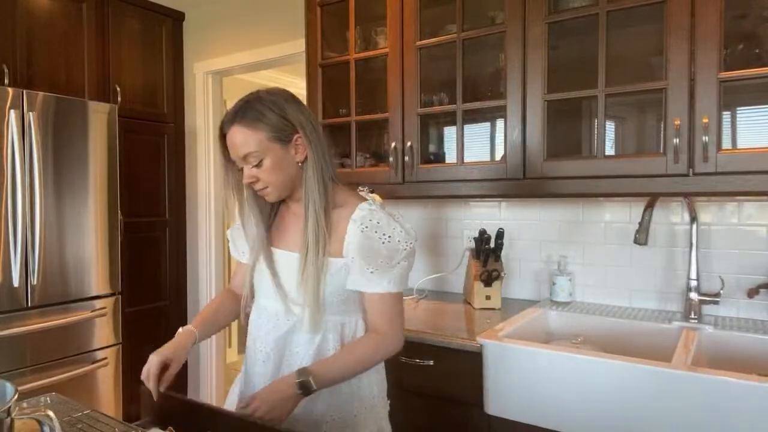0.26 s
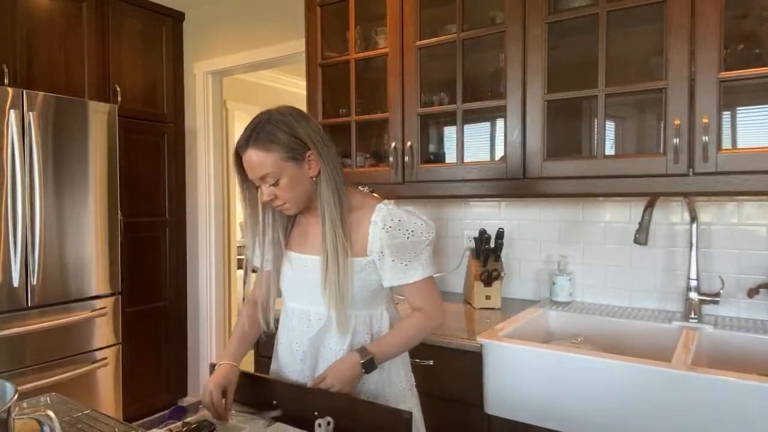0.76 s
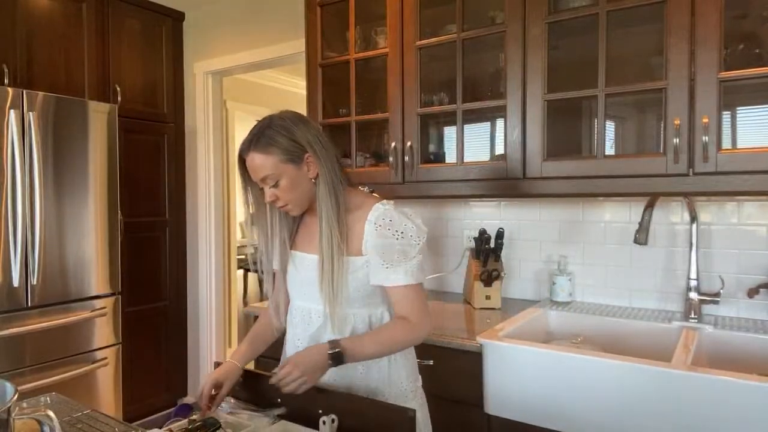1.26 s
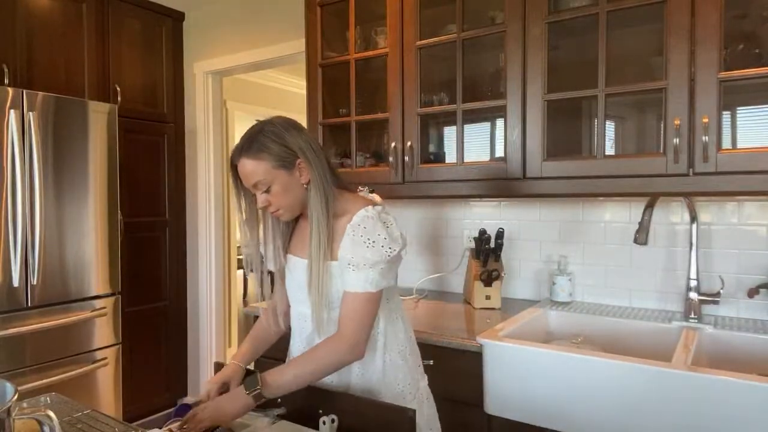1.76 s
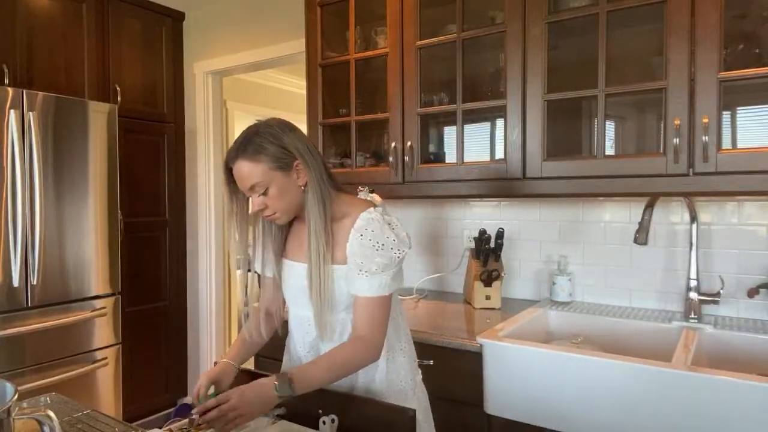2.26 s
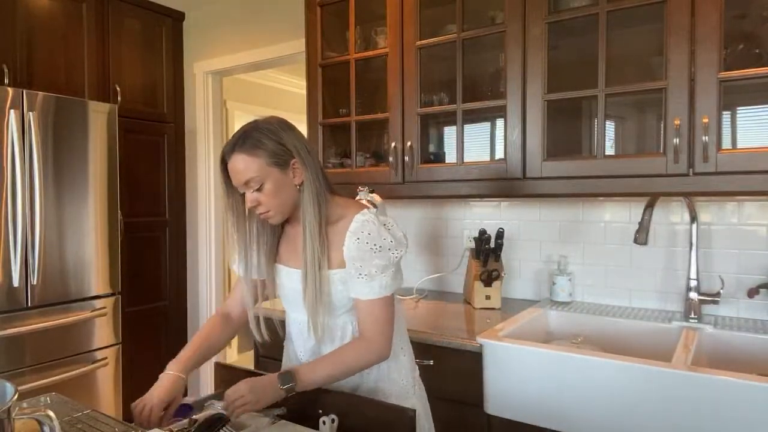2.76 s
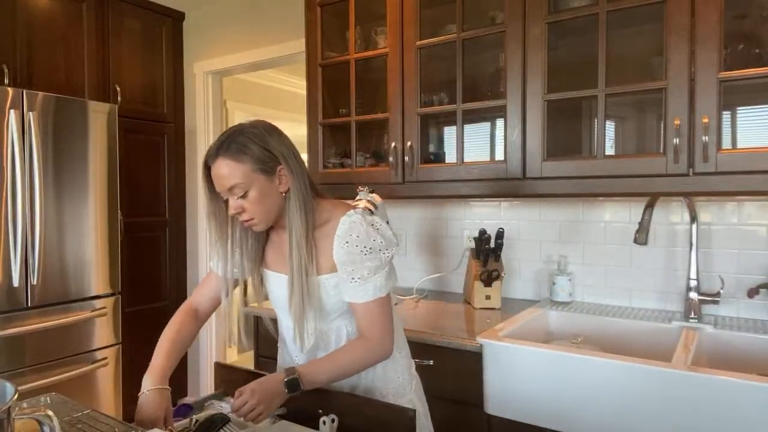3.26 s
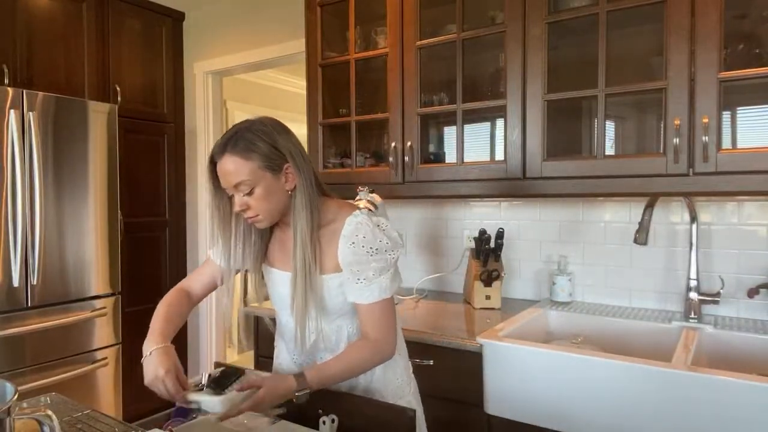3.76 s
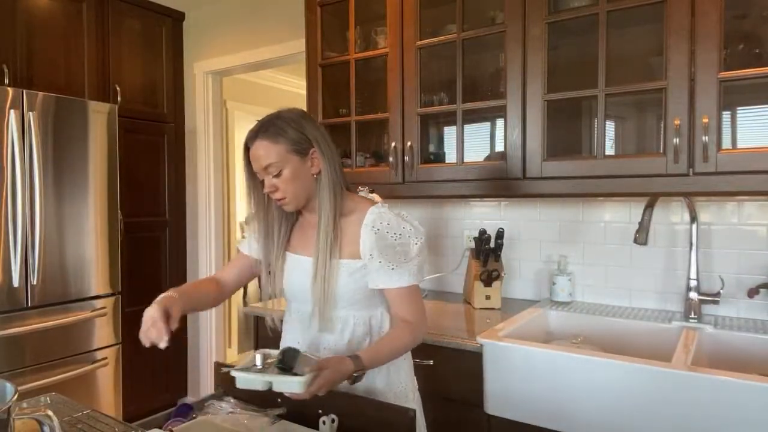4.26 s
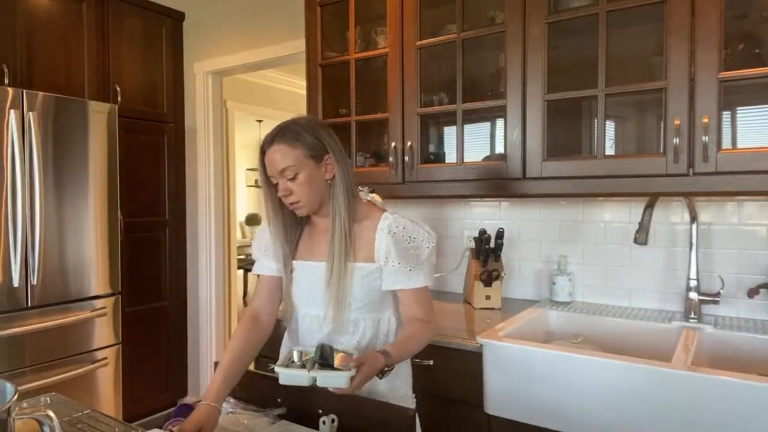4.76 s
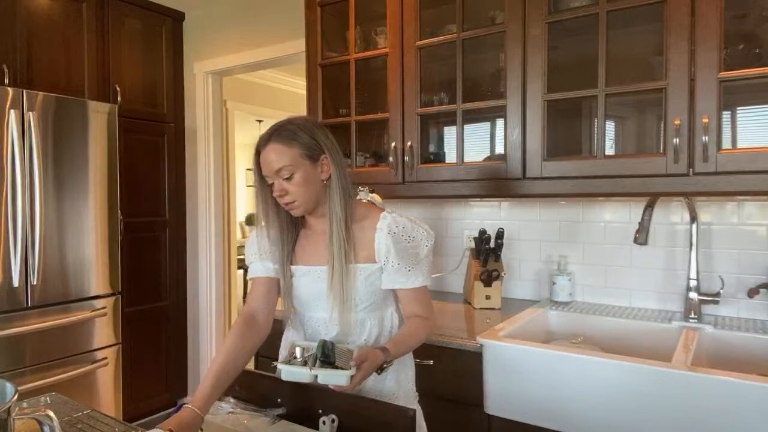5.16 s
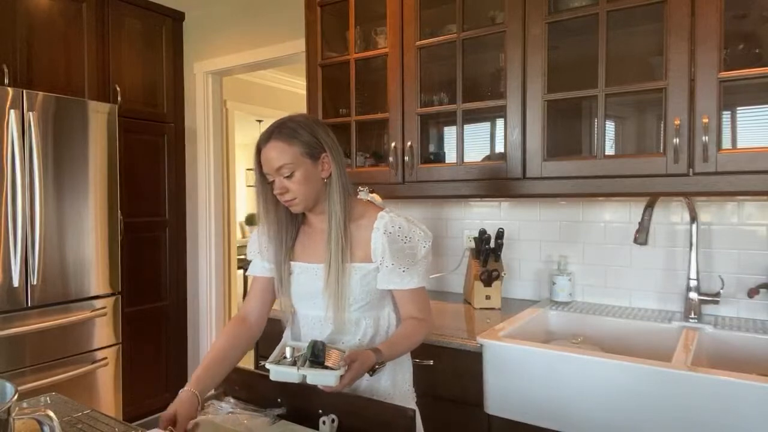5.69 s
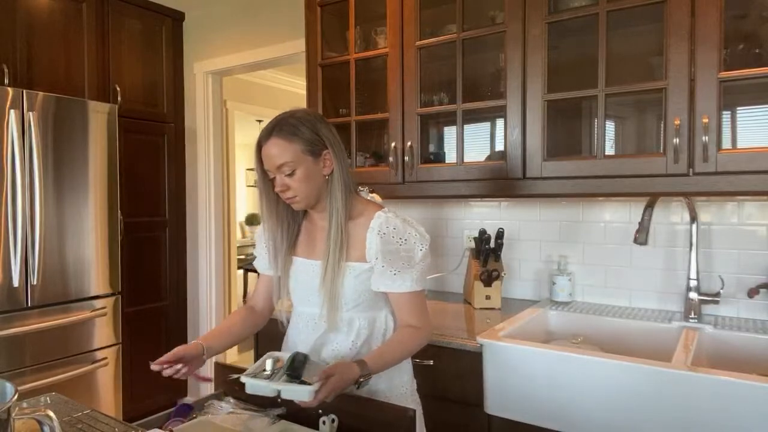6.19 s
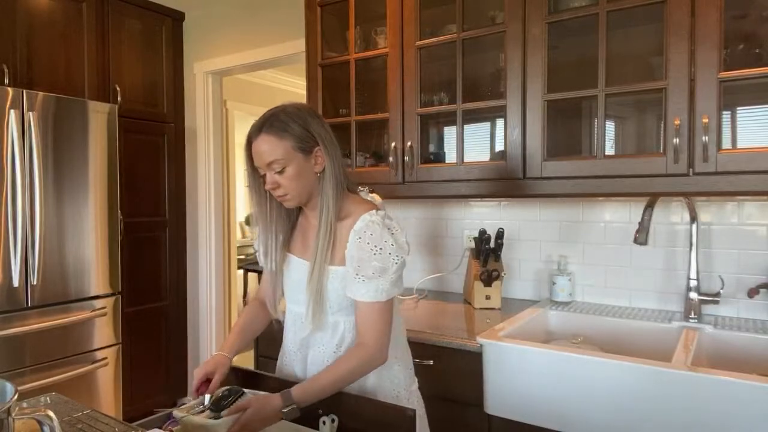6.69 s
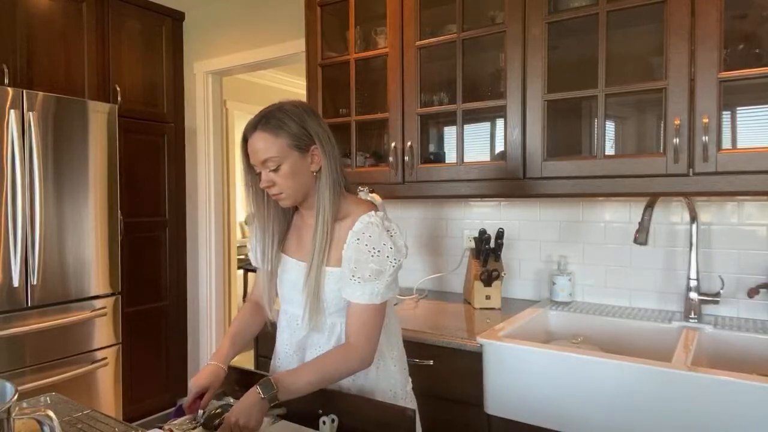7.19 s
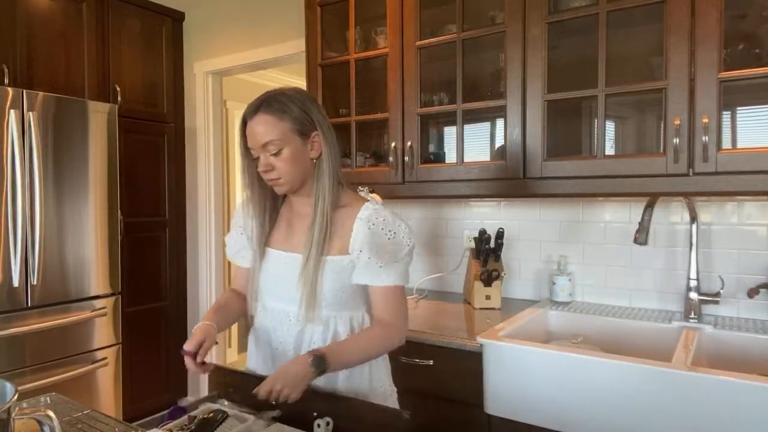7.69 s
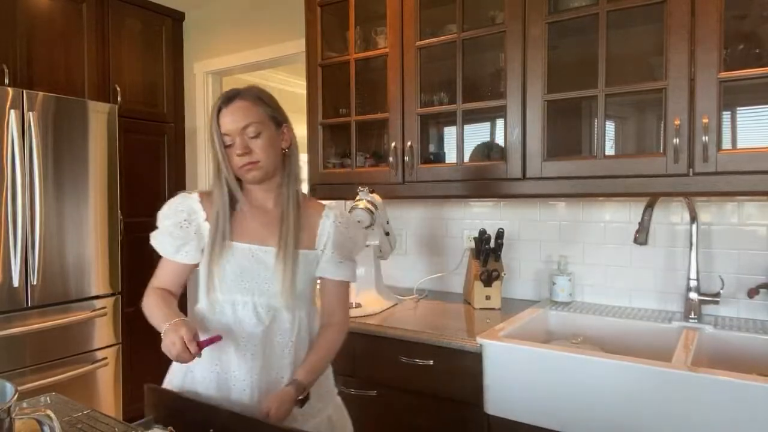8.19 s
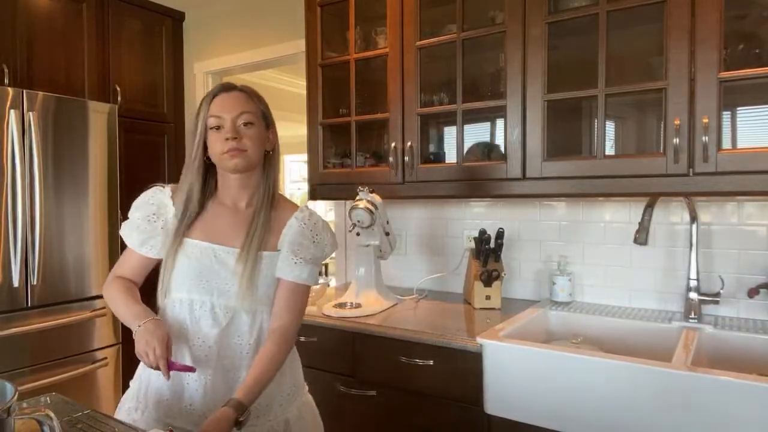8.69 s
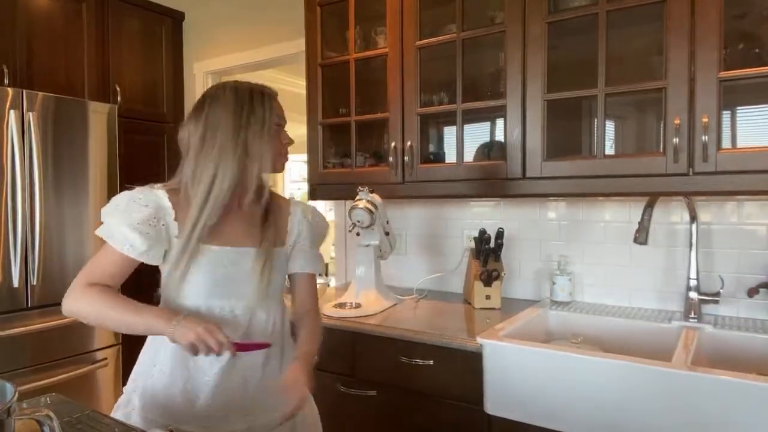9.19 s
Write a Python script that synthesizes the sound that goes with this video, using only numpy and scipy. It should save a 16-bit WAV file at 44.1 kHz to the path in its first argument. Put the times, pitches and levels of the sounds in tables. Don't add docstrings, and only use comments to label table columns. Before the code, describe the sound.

Cutlery rattles, clatters and knocks as someone searches a utensil drawer in a hard, tiled kitchen, finally rolling it closed with a heavy thud.

```python
import sys
import numpy as np
from scipy import signal
from scipy.fft import rfft, irfft
from scipy.io import wavfile
from scipy.ndimage import uniform_filter1d

SR = 44100
rng = np.random.default_rng(int(sys.argv[2]) if len(sys.argv) > 2 else 0)


def put_to_file(sound):
    columns = np.atleast_2d(sound).T
    safe = np.clip(columns, -1, 1)
    whole_steps = np.round(safe * 32767)
    wavfile.write(sys.argv[1], SR, whole_steps.astype(np.int16))


def how_loud(loudness_db):
    steps = np.asarray(loudness_db, float) / 20
    return 10 ** steps


N = 416304

# pitch_hz, width_hz, level_db
DRAWER_WOOD = [(145.3, 4.63, 11), (190, 22, -0.5), (270.7, 17, 3.5), (306, 60, -5), (412, 62, -2.5)]
# freq_hz, level_db (per Hz)
STEEL_EDGE = [(4500, -3.5), (8000, -2), (16000, -8.5)]


def colour(x, table):
    hz, db = np.transpose(table)
    f = np.fft.rfftfreq(x.shape[-1], 1 / SR) + 1
    gain = how_loud(np.interp(np.log(f), np.log(hz), db))
    return irfft(rfft(x) * gain, x.shape[-1])


def level(x, db):
    return x * how_loud(db) / np.sqrt(np.mean(x ** 2))


def peak(x, db):
    return x * how_loud(db) / np.sqrt(uniform_filter1d(x ** 2, size=176).max())


def ring(hz, db, t60, size):
    t = np.arange(size)[:, None] / SR
    sign = (-1) ** np.arange(np.size(hz))
    fade = np.exp(-np.log(1000) * t / t60)
    return (sign * how_loud(db) * np.sin(2 * np.pi * hz * t) * fade).sum(axis=1)


def body(table, size=2048):
    hz, width, db = np.transpose(table)
    t = np.arange(size)[:, None] / SR
    sign = (-1) ** np.arange(len(hz))
    modes = sign * how_loud(db) * width * np.sin(2 * np.pi * hz * t) * np.exp(-np.pi * width * t)
    return modes.sum(axis=1) * np.linspace(1, 0, size)


def contacts(shape, rate, spread_db):
    size_db = spread_db * np.minimum(rng.exponential(size=shape), 3.0)
    return (rng.random(shape) < rate / SR) * rng.standard_normal(shape) * how_loud(size_db)


def flurries(t60, rate, first, size=6144):
    t = np.arange(size) / SR
    t60 = np.clip(t60, .01, .4)[:, None]
    chatter = level(contacts((len(t60), size), rate, 0.52), 0)
    push = chatter * np.exp(-np.log(1000) * t / t60) * (1 - np.exp(-t / 0.0026))
    push[:, 0] = first
    return push


def walk(rate):
    k = int(SR / rate)
    held = np.repeat(rng.standard_normal(N // 100)[:N // k + 1], k)[:N]
    return 1.2 * uniform_filter1d(held, k)


def add(out, s, x):
    i = int(s * SR)
    out[i:i + len(x)] += x[:len(out) - i]


def steel(push, bright_db):
    # freq_hz, level_db (per Hz)
    steel_body = [(1500, 3.5), (2300, 2), (3500, -2), (7000, -12.5), (16000, -31.5)]
    edges = level(colour(push, STEEL_EDGE), 0)
    return level(colour(push, steel_body), 0) + how_loud(bright_db - 4.5) * edges


def fridge():
    # freq_hz, level_db (per Hz)
    air_colour = [(15, -72), (25, -52.5), (74, -10), (111, -6.5), (242, -0.5), (317, -6), (354, -15),
                  (451, -7), (659, -9.5), (714, -11), (1330, -12.5), (2350, -20.5), (2990, -21),
                  (16000, -40.5)]
    # pitch_hz, level_db
    hum_lines = [(651.4, -70.5), (1012, -76), (1308, -77), (2218, -84)]
    air_db = -56.5
    t = np.arange(N) / SR
    out = level(colour(rng.standard_normal(N), air_colour), air_db - 3) * how_loud(0.7 * walk(2.2))
    for hz, db in hum_lines:
        gain = np.sqrt(2) * how_loud(db + 2.9 * walk(23))
        out = out + gain * np.sin(2 * np.pi * hz * t + 1.3 * walk(10))
    return out


def kitchen(x, size=32768):
    # freq_hz, t60_s
    room_t60 = [(150, 0.46), (500, 0.3), (1500, 0.52), (5000, 0.45), (14000, 0.25)]
    room_db = -7
    t, echo = np.arange(size) / SR, 0
    hz, t60 = np.transpose(room_t60)
    for f in 88 * 2 ** np.arange(8.):
        octave = signal.butter(2, [f / np.sqrt(2), f * np.sqrt(2)], "band", fs=SR, output="sos")
        band = signal.sosfilt(octave, rng.standard_normal(size))
        band_t60 = np.interp(np.log(f), np.log(hz), t60)
        echo = echo + band * np.exp(-np.log(1000) * t / band_t60)
    echo = echo * np.clip((t - .003) / 0.012, 0, 1)
    power = abs(rfft(echo)) ** 2
    even = np.sqrt(uniform_filter1d(power, size=500) / uniform_filter1d(power, size=70))
    echo = irfft(rfft(echo) * even)[:-2048]
    return x + how_loud(room_db) * signal.fftconvolve(x, echo / np.sqrt(np.sum(echo ** 2)))[:N]


def cabinet():
    # start_s, boom_db, floor_db
    booms = [
        (8.799, -67, -61),
        (8.889, -60, -64),
        (9.096, -27, -47),
        (9.27, -32, -64),
    ]
    cabinet_hz, cabinet_t60_s = 148, 0.19
    floor_hz, floor_t60_s = 76, 0.28
    out = np.zeros(N)
    for s, boom_db, floor_db in booms:
        for hz, db, t60 in ((cabinet_hz, boom_db, cabinet_t60_s), (floor_hz, floor_db, floor_t60_s)):
            cycle = int(SR / hz)
            push = np.hanning(4 * cycle) * np.sin(np.arange(4 * cycle) * 2 * np.pi / cycle)
            add(out, s, peak(signal.fftconvolve(ring(hz, 0, t60, size=16384), push), db))
    return out


def sleeve():
    # start_s, end_s, level_db
    swishes = [(7.641, 8.295, -72.5), (8.204, 8.52, -72.5), (8.545, 8.847, -69), (8.808, 8.994, -67)]
    out = np.zeros(N)
    for start, end, db in swishes:
        size = int((end - start) * SR)
        friction = colour(contacts(32768, 20000, 1.3), STEEL_EDGE)[:size]
        add(out, start, level(friction * np.hanning(size), db))
    return out


def rustle():
    # start_s, end_s, level_db
    drag = (3.18, 3.39, -57.5)
    # pitch_hz, width_hz, level_db
    wrapper = [(5200, 570, 10), (2640, 1500, 3.5), (6000, 700, 3), (7450, 2900, -1), (8840, 1200, 1)]
    start, end, db = drag
    out, size = np.zeros(N), int((end - start) * SR)
    patter = contacts(16384, 4700, 1.5)[:size] * np.hanning(size) ** 0.81
    add(out, start, level(signal.fftconvolve(patter, body(wrapper, size=512)), db))
    return out


def sliding():
    # time_s, effort_db (over rest)
    hand = [(1.17, 2.5), (1.62, 9.5), (1.76, 26), (1.98, 2), (2.37, 7.5), (2.52, 16), (2.85, 7), (3.3, 18),
            (3.7, 0.5), (4.22, 5.5), (4.43, -1), (4.83, 12), (5.15, 15.5), (5.76, 19.5), (6.06, 7),
            (6.92, 2.5), (7.2, 20.5), (7.55, 4.5)]
    # time_s, rolling_db
    drawer_runs = [
        [(0.0, -45), (0.055, -47.5), (0.1, -42), (0.2, -43), (0.452, -40.5), (0.78, -62), (0.9, -81.5)],
        [(7.65, -80), (7.778, -75), (7.808, -47.5), (8.05, -43.5)],
        [(8.27, -47.5), (8.59, -46.5), (8.734, -50.5), (8.83, -38), (9.05, -61), (9.37, -41.5), (9.44, -72)],
    ]
    # rest_db, slope (dB per dB of effort)
    stirred = [(-62, 0.3137), (-69, 1.0166), (-73.5, 1.1146)]
    carried = [-6.5, -3.5, -13.5]
    # pitch_hz, width_hz, level_db
    tray = [(557, 230, 17), (861, 100, 16.5), (1200, 290, 8), (1760, 290, -3.5), (2350, 200, -5.5)]
    t = np.arange(N) / SR
    effort_db = np.interp(t, *np.transpose(hand))
    run_db = np.interp(t, *np.transpose(sum(drawer_runs, [])))
    roll_gain, rub_gain, scrape_gain = (np.hypot(how_loud(rest_db + slope * effort_db), how_loud(run_db + db))
                                        for (rest_db, slope), db in zip(stirred, carried))
    grip_db = walk(30)
    roll = signal.fftconvolve(contacts(N, 1500, 4.0), body(DRAWER_WOOD))[:N]
    rub = signal.fftconvolve(contacts(N, 5000, 5.0), body(tray))[:N]
    scrape = steel(contacts(N, 20000, 1.2), -8.5)
    out = level(roll, -3.5) * roll_gain * how_loud(2.2 * grip_db)
    out = out + level(rub, -8.5) * rub_gain * how_loud(grip_db)
    return out + scrape * scrape_gain * how_loud(grip_db - 8.0)


def thumps():
    # start_s, level_db, pitch_hz
    blows = [(0.071, -41, 253), (0.19, -35, 272), (0.277, -43, 258), (1.733, -53, 441), (1.877, -34.5, 433),
             (2.496, -33, 400), (3.258, -54, 439), (3.705, -56, 334), (4.948, -33, 281), (4.973, -32, 168),
             (5.065, -39, 428), (5.132, -27, 298), (5.151, -27, 291), (5.214, -36, 252),
             (5.446, -29.5, 185), (5.513, -32.5, 450), (5.601, -29, 450), (5.837, -30.5, 205),
             (6.505, -51, 236), (6.921, -38, 387), (7.099, -32, 196), (7.164, -39.5, 179),
             (7.254, -23.5, 198), (7.294, -42, 409), (7.81, -45.5, 148), (8.824, -37, 435),
             (9.094, -17.5, 403), (9.124, -31, 388), (9.264, -33.5, 412)]
    t60_s = 0.11
    out, wood = np.zeros(N), np.array(DRAWER_WOOD)
    for (s, db, hz), push in zip(blows, flurries([t60_s] * len(blows), 6000, first=25.0)):
        panel_db = -9 * abs(np.log2(wood[:, 0] / hz))
        panel = body(wood + np.outer(panel_db, [0, 0, 1]))
        add(out, s, peak(signal.fftconvolve(push, panel), db - 9.5))
    return out


def clinks(size=8192):
    # pitch_hz, level_db, t60_s
    spoon = [(8400, 0, .06), (9065, 0, .12), (12640, 2, .06), (12775, 3, .075), (12900, 2, .06),
             (13690, 3, .06), (14933, 1, .065)]
    ladle = [(9065, -2, .05), (12600, 2, .04), (12775, 3, .055), (12930, 2, .04), (14100, -6, .04),
             (15200, -5, .05)]
    fork = [(5830, 2, .07), (7860, 7, .07), (8050, 5, .06), (9631, -2, .06), (10427, -3, .1),
            (12909, -3, .08), (14104, 2, .08), (14217, 6, .06), (15149, -2, .06)]
    # start_s, peak_db
    spoon_hits = [(1.74, -43), (1.771, -45), (6.9744, -65)]
    ladle_hits = [(7.199, -54), (7.27, -51)]
    fork_hits = [(4.1566, -51), (4.2434, -61)]
    # start_s, level_db, pitch_hz, jostle_s
    pings = [(0.659, -53, 2400, 0.0068), (1.584, -48, 2000, 0.0075), (1.625, -56, 2160, 0.0042),
             (1.74, -40, 10040, 0.012), (5.708, -60, 4350, .015), (3.421, -70, 5600, .02),
             (4.242, -47, 2140, 0.0059), (4.907, -55, 6000, 0.018), (5.218, -56, 3370, 0.011),
             (5.26, -34.5, 2480, 0.0054), (5.33, -60, 11800, 0.018), (5.657, -52, 2880, 0.014),
             (5.784, -46.5, 6080, 0.011), (5.793, -51, 1830, 0.033), (5.853, -51, 2900, 0.018),
             (7.055, -60, 3100, 0.03), (5.9, -68, 9700, .03), (6.606, -69, 13650, 0.026),
             (7.205, -50.5, 2900, 0.022), (7.035, -63.5, 6000, .015), (7.035, -57, 7500, 0.0091),
             (8.771, -59, 4100, 0.11), (9.39, -58, 4220, 0.052), (2.493, -34.5, 1900, 0.017),
             (9.096, -24.5, 375, 0.017), (4.999, -52, 1430, 0.02), (5.148, -45, 332, 0.0072)]
    out, t = np.zeros(N), np.arange(size) / SR
    for modes, hits in ((spoon, spoon_hits), (ladle, ladle_hits), (fork, fork_hits)):
        hz, db, t60 = np.transpose(modes)
        for s, hit_db in hits:
            jostle = contacts(size, 600, 3.0) * np.exp(-t / 0.022)
            rung = signal.fftconvolve(ring(hz, db, t60, size=size), jostle)
            add(out, s, peak(rung, hit_db - 1.0))
    for (s, db, hz, length), jostle in zip(pings, contacts((len(pings), size), 3400, 0.91)):
        jostle[0] = 2.6
        note = ring(hz, 0, .012 + 0.19 * length + 14 / hz, size=size)
        add(out, s, peak(signal.fftconvolve(note, jostle * np.exp(-t / length)), db))
    return out


def jangles():
    # start_s, level_db, flurry_t60_s; the whole-pieces row at 0.004 s
    clanks = [(0.623, -51, 0.19), (0.6602, -48, .1), (0.856, -49, .14), (1.625, -40.5, 0.36),
              (1.7044, -38, 0.19), (1.7325, -34, 0.049), (1.876, -34.5, 0.06), (2.3235, -30, 0.076),
              (2.4939, -22, 0.072), (2.7878, -48.5, 0.063), (3.016, -44, 0.12), (5.471, -39, 0.21),
              (5.5573, -33, 0.17), (5.6004, -37.5, 0.078), (6.504, -39, 0.014), (6.9675, -38.5, 0.022),
              (7.0994, -44, 0.05), (7.201, -44, 0.088), (7.2654, -24.5, 0.067), (9.094, -19.5, 0.072),
              (9.2668, -40.5, 0.18)]
    whole_pieces = [(0.26, -47, 0.47), (0.416, -43, 0.048), (1.576, -43, 0.15), (2.5177, -20.5, 0.082),
                    (3.147, -33.5, 0.15), (4.0454, -43, 0.23), (4.134, -47, 0.063), (4.2445, -36.5, 0.12),
                    (4.7717, -53, 0.1), (5.008, -33, 0.31), (5.2598, -28.5, 0.13), (5.42, -41.5, 0.4),
                    (5.5132, -40.5, 0.2), (6.504, -38, 0.11), (5.8462, -41.5, 0.38), (0.004, -49, 0.4),
                    (6.9215, -46, 0.22), (7.0334, -41.5, 0.14), (7.2615, -28, 0.07), (9.1009, -31.5, 0.88),
                    (9.375, -40, 0.28)]
    tinkles = [(1.603, -45, 0.09), (1.7417, -29, 0.22), (1.7693, -35.5, 0.28), (1.8, -40, 0.12),
               (2.519, -29.5, 0.24), (3.4544, -53, 0.14), (3.6492, -46.5, 0.045), (3.705, -46.5, 0.092),
               (4.158, -45.5, 0.25), (4.844, -51, 0.45), (4.9055, -38.5, 0.17), (4.967, -34.5, 0.21),
               (5.216, -41, 0.35), (5.2397, -34.5, 0.083), (5.3297, -42, 0.081), (5.6545, -42, 0.03),
               (5.7817, -39.5, 0.32), (5.892, -38.5, 0.23), (5.9144, -41, 0.097), (6.505, -36.5, 0.026),
               (7.1644, -42.5, 0.11), (8.763, -43.5, 0.47), (8.8245, -42, 0.11), (9.125, -35.5, 0.36)]
    out = np.zeros(N)
    for table, edge_db in ((clanks, -39), (whole_pieces, -5), (tinkles, 7)):
        chance = rng.random((len(table), 16))
        pushes = flurries(np.array(table)[:, -1], 14000, first=4.4)
        for (s, db, _), push, spot in zip(table, pushes, chance):
            modes = .012 * ring(3000 + 12500 * spot, 0, .02, size=512)
            rung = push + signal.fftconvolve(push, modes)[:len(push)]
            add(out, s - 128 / SR, peak(steel(np.roll(rung, 128), edge_db), db - 8.0))
    return out


def drops():
    # pitch_hz, width_hz, level_db
    tray_floor = [(560, 64.5, 2), (750, 83.5, -3), (861, 45.5, 0.5), (1045, 75.5, 1.5), (1440, 64, -8),
                  (1707, 83.5, -3), (1900, 90, -8), (2160, 63, -8), (2514, 84, -11.5)]
    # start_s, level_db, pitch_hz
    bounces = [(2.4942, -20, 1010), (2.4965, -29, 2000), (2.4991, -27, 900), (2.508, -29.5, 1520),
               (2.5185, -24, 850), (2.5233, -26.5, 848), (2.532, -29, 699), (2.541, -25.5, 791),
               (2.553, -31, 1820), (2.565, -35, 900), (2.605, -43, 908), (2.62, -50, 1000),
               (2.645, -43, 1000), (2.67, -45, 1000), (2.324, -36.5, 1150)]
    # start_s, level_db, pitch_hz, t60_s
    ticks = [(1.568, -42, 725, 0.026), (1.587, -41, 2000, 0.021), (1.587, -48, 1044, 0.059),
             (1.626, -42, 2240, 0.018), (1.633, -44.5, 1440, .04), (1.733, -34.5, 940, 0.018),
             (1.755, -40.5, 560, 0.034), (1.876, -39.5, 1030, 0.026), (1.877, -46, 1830, .02),
             (1.882, -48, 1800, 0.018), (1.906, -55, 1030, 0.029), (2.494, -32, 930, 0.022),
             (2.493, -31, 1770, 0.026), (2.494, -32, 2440, .025), (2.519, -25, 1010, .02),
             (2.551, -32, 1952, 0.03), (3.157, -47, 3270, .02), (3.3, -53, 2390, .05),
             (.355, -52, 996, .04), (4.247, -58, 11200, .04), (4.255, -63, 13600, .08),
             (4.282, -62, 7900, .05), (5.221, -45, 3320, 0.056), (5.228, -54, 3350, 0.05),
             (5.275, -50, 2550, 0.07), (5.798, -42, 1800, 0.022), (5.811, -46, 1880, 0.044),
             (5.839, -45, 1830, 0.018), (5.845, -46, 3250, 0.027), (5.873, -49, 3480, .03),
             (5.893, -44, 1820, 0.015), (5.904, -43, 1820, .014), (5.917, -42, 1890, .016),
             (5.917, -49, 1200, 0.071), (5.903, -43.5, 756, 0.03), (5.915, -44.5, 800, 0.035),
             (6.505, -47, 1140, 0.08), (7.337, -49, 1200, 0.041), (9.093, -24, 762, 0.016),
             (9.097, -27, 958, 0.05), (9.121, -31, 1023, 0.052), (9.124, -35, 1410, 0.032),
             (9.146, -31, 1390, 0.03), (9.159, -31.5, 1150, 0.034), (9.183, -39.5, 380, .05),
             (9.246, -43, 394, 0.13), (9.265, -38.5, 877, 0.069), (9.272, -34, 426, 0.077),
             (.072, -40.5, 255, 0.13), (.074, -46, 705, .04), (.096, -52, 407, 0.054),
              (.415, -61, 6230, .03), (0.406, -48.5, 432, 0.084), (.44, -49, 442, 0.13),
              (2.326, -41.5, 556, 0.085), (2.352, -50, 1250, 0.051), (2.372, -48, 1200, 0.044),
              (2.452, -52, 1034, 0.16), (3.146, -42, 815, 0.032), (3.153, -42.5, 642, 0.12),
              (3.157, -43, 2770, 0.035), (3.162, -45, 1004, 0.055), (3.255, -47, 506, 0.046),
              (3.282, -49, 453, 0.033), (4.046, -51, 810, .03), (4.052, -53.5, 1580, .05),
              (4.16, -50, 1114, 0.034), (4.202, -54, 2890, 0.04), (4.243, -43, 2020, 0.022),
              (4.245, -44.5, 840, 0.03), (4.266, -44, 887, 0.02), (4.877, -49.5, 298, 0.03),
              (4.977, -45, 3840, .03), (5.012, -46, 1510, 0.036), (5.024, -41, 1490, .03),
              (5.162, -54, 320, .04), (5.173, -49, 263, 0.046), (5.231, -42, 247, .05),
              (5.244, -52, 253, 0.061), (5.261, -29, 830, 0.01), (5.274, -45, 794, 0.022),
              (5.474, -45, 750, 0.023), (5.513, -42.5, 1045, 0.036), (5.603, -39, 1075, .02),
              (6.967, -47.5, 3150, 0.0098), (7.163, -42.5, 188, 0.12), (7.259, -34, 840, 0.034),
              (7.269, -38, 1104, 0.039), (7.298, -41, 1130, 0.033), (7.315, -41.5, 330, 0.057),
              (7.982, -43.5, 412.5, 0.29), (8.275, -51.5, 710, 0.15), (8.762, -54, 3970, 0.035),
              (8.825, -55, 4140, .025), (8.822, -56, 10000, .06), (8.824, -63, 14300, .04)]
    # start_s, level_db, pitch_hz
    cracks = [(.0675, -42, 850), (1.6255, -43, 2300), (1.756, -42, 700), (4.2434, -38, 1900),
              (5.474, -51, 1400), (5.516, -50, 1300), (5.561, -38, 1500), (6.921, -49, 700),
              (6.923, -52, 3700), (7.0271, -35.5, 850), (7.043, -41, 1200), (7.1, -44, 2200),
              (7.205, -46, 1200), (3.1574, -37.5, 1500)]
    out, modes = np.zeros(N), np.array(tray_floor)
    for s, db, hz in bounces:
        near_db = -6 * abs(np.log2(modes[:, 0] / hz))
        add(out, s, peak(body(modes + np.outer(near_db, [0, 0, 1])), db))
    for s, db, hz, t60 in ticks:
        touch = ring(hz, 0, 9., size=int(1.5 * SR / hz) + 2)
        add(out, s, peak(np.convolve(ring(hz, 0, t60, size=6144), touch), db))
    for s, db, hz in cracks:
        add(out, s, peak(ring(hz, 0, 6.0 / hz, size=1024), db))
    return out


def knocks():
    # start_s, level_db, pitch_hz
    tap_blows = [(0.278, -47, 473), (0.662, -48, 1430), (1.586, -36.5, 760), (1.754, -30, 700),
                 (1.877, -39, 1030), (2.324, -32, 1260), (2.545, -34, 580), (2.788, -47.5, 802),
                 (4.2445, -38, 2080), (4.25, -52, 880), (5.021, -40, 1550), (5.064, -36.5, 774),
                 (5.261, -28, 980), (5.446, -46, 580), (5.601, -34, 470), (5.709, -26.5, 590),
                 (6.504, -52, 1180), (7.027, -36.5, 1050), (7.036, -35.5, 780), (7.135, -38.5, 440),
                 (7.203, -41.5, 1070), (7.251, -31.5, 1050), (7.256, -28.5, 870), (7.266, -29, 410),
                 (7.293, -38, 1230), (7.458, -40.5, 960), (9.093, -29.5, 690), (9.1, -20.5, 980)]
    knock_blows = [(0.067, -39, 506), (0.414, -39, 796), (1.568, -38, 720), (1.63, -52, 1410),
                   (1.732, -33, 890), (2.494, -27.5, 890), (2.518, -27, 820), (3.017, -55, 1320),
                   (3.151, -38, 675), (3.157, -37, 935), (3.705, -47.5, 660), (4.975, -35.5, 1520),
                   (5.513, -40, 463), (5.559, -28.5, 536), (5.834, -37.5, 475), (5.905, -37, 1250),
                   (6.967, -39, 861), (7.1, -40.5, 444), (7.165, -39.5, 560), (9.123, -36, 1255),
                   (9.266, -28.5, 440)]
    shove_blows = [(0.19, -44.5, 634), (3.256, -48, 450), (4.044, -42, 1410), (4.157, -45, 1120),
                   (5.132, -41, 436), (5.215, -53, 633), (5.418, -36, 820), (5.474, -39, 730),
                   (6.921, -42, 825), (7.806, -53, 850), (8.02, -57, 430), (8.4, -40, 413),
                   (8.537, -44, 417), (8.765, -56, 1500), (8.825, -42, 1500)]
    tap_t60_s, knock_t60_s, shove_t60_s = 0.11, 0.16, 0.47
    tray_cycles = 14
    out = np.zeros(N)
    thin = signal.butter(3, 380, "high", fs=SR, output="sos")
    ladder_hz = np.geomspace(430, 3400, num=24)
    for table, t60 in ((tap_blows, tap_t60_s), (knock_blows, knock_t60_s), (shove_blows, shove_t60_s)):
        chance = rng.standard_normal((len(table), 2, 24))
        pushes = flurries([t60] * len(table), 6000, first=8.2)
        for (s, db, hz), push, (spot, size) in zip(table, pushes, chance):
            mode_hz = np.append(ladder_hz * (1 + 0.065 * spot), hz)
            mode_db = np.append(-7 * abs(np.log2(ladder_hz / hz)) + 1.2 * size, 1.0)
            modes = ring(mode_hz, mode_db, tray_cycles / (mode_hz + 300), size=1024)
            rung = signal.sosfilt(thin, signal.fftconvolve(push, modes))
            add(out, s, peak(rung, db - 6.5))
    return out


def scene():
    mic_low_hz = 136
    near = kitchen(knocks() + drops() + thumps() + jangles() + clinks() + rustle() + sliding() + sleeve())
    low_cut = signal.butter(4, mic_low_hz, "high", fs=SR, output="sos")
    mono = signal.sosfilt(low_cut, near) + fridge() + cabinet()
    return np.array([mono, mono])


def low_pass(x):
    return signal.sosfilt(signal.butter(12, 16410, fs=SR, output="sos"), x)


def record(dry):
    # start_s, silence_s, back_s
    fades = [
        (3.838, 3.95, 4.045),
        (8.056, 8.16, 8.251),
    ]
    fade_db_per_s, top_hz = -390, 15800
    t, gain = np.arange(N) / SR, 1
    for start, off, back in fades:
        fade = how_loud(fade_db_per_s * np.clip(t - start, 0, 1)) * (t < off)
        gain = gain * np.maximum(fade, np.clip((t - back) / 0.0029 + 1, 0, 1))
    top_cut = signal.ellip(10, .2, 70, top_hz, fs=SR, output="sos")
    return low_pass(signal.sosfilt(top_cut, dry * gain))


dry = scene()
out = record(dry)
put_to_file(out)
```